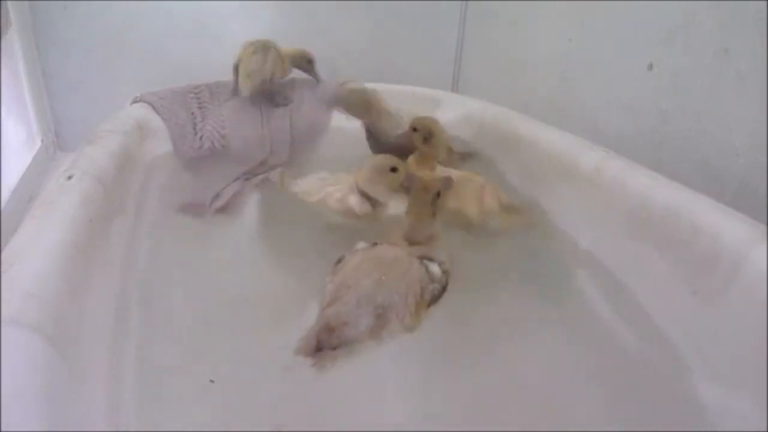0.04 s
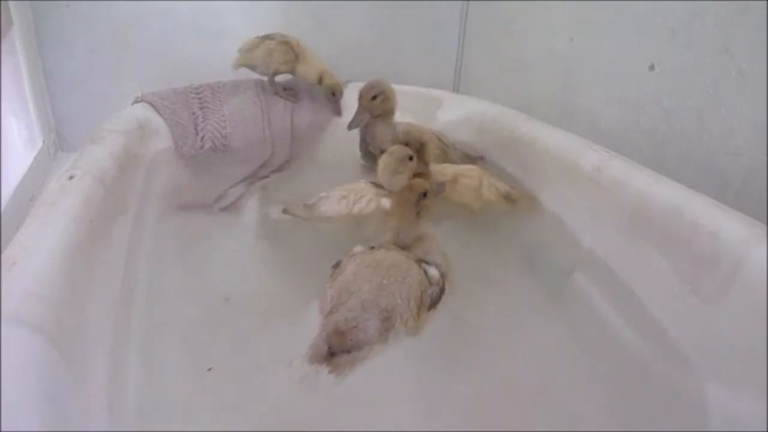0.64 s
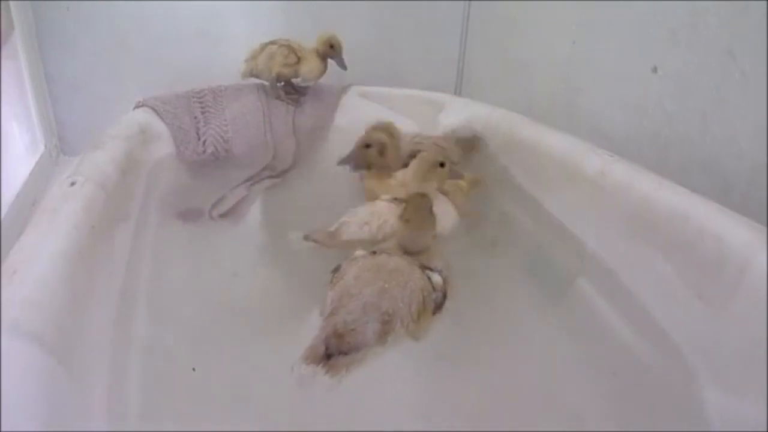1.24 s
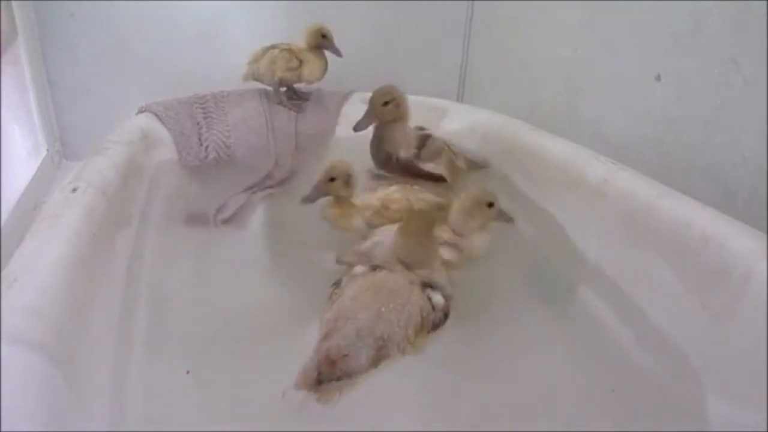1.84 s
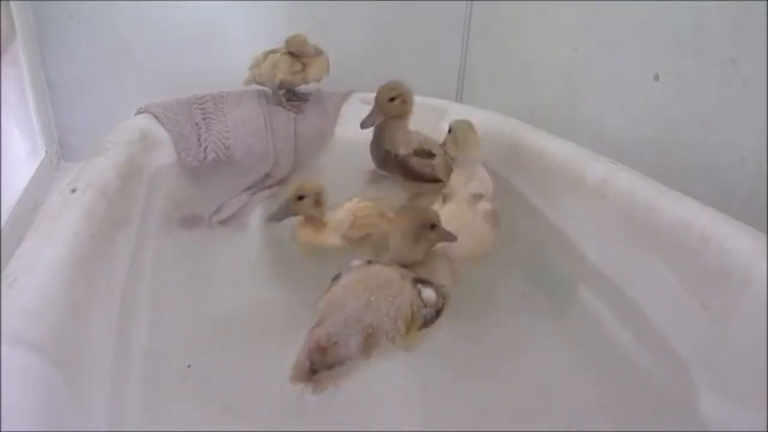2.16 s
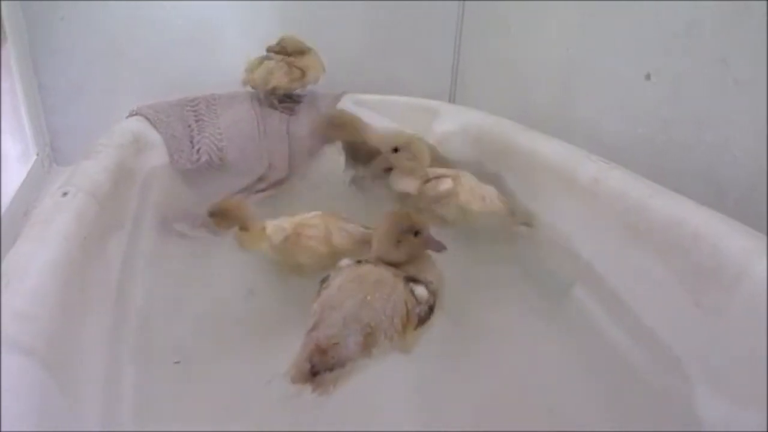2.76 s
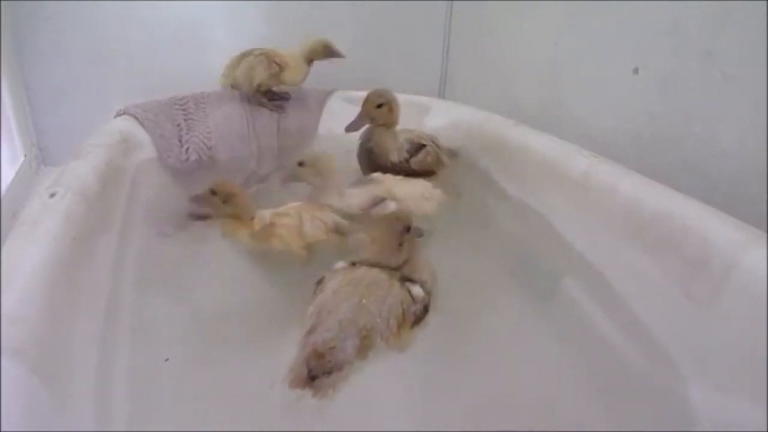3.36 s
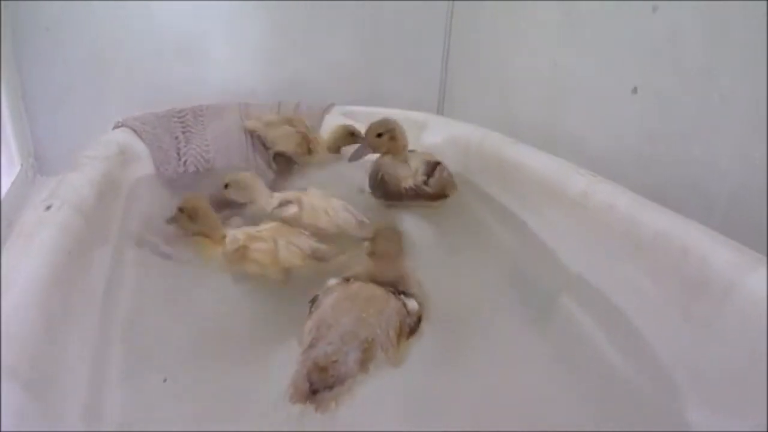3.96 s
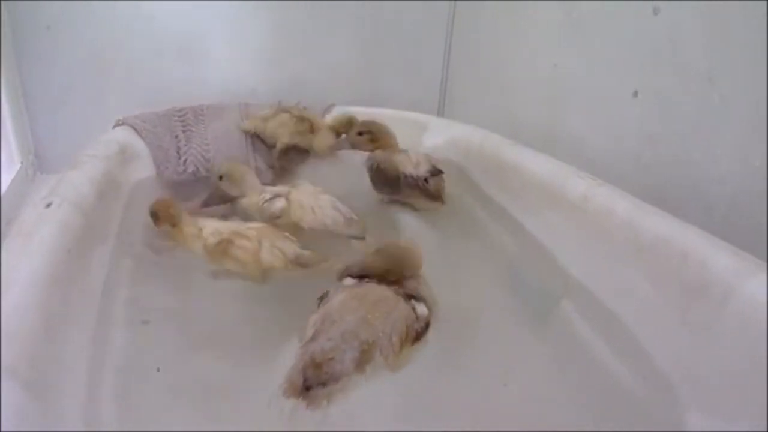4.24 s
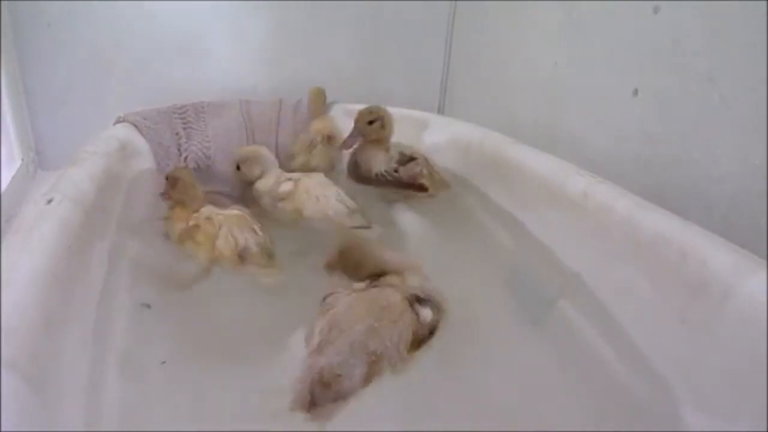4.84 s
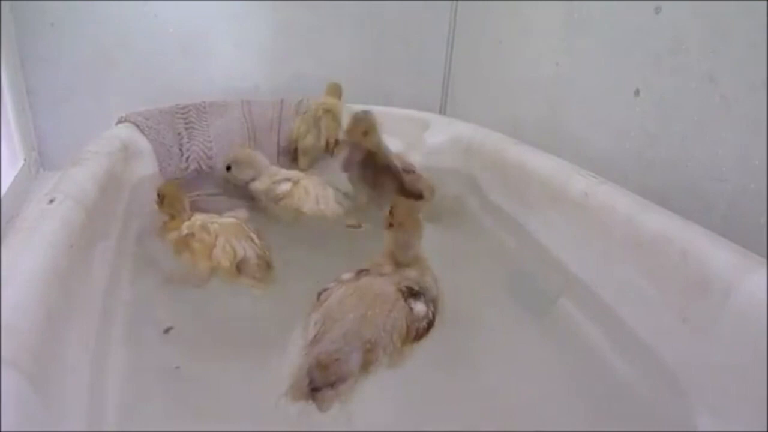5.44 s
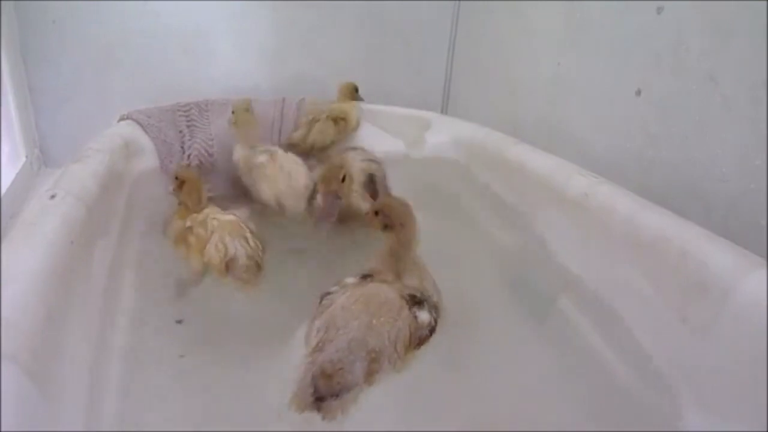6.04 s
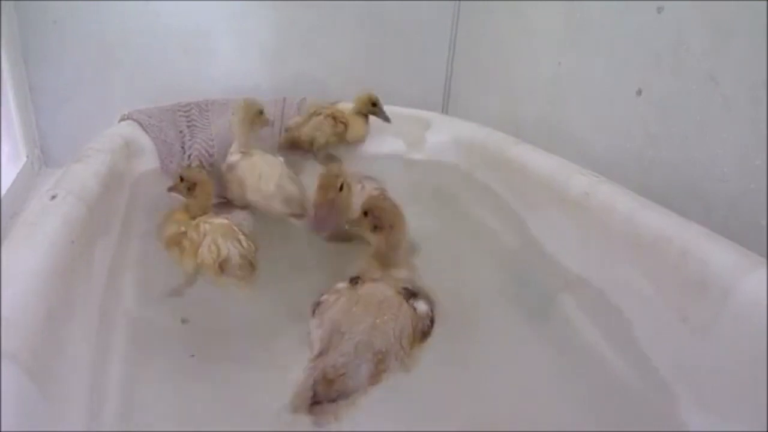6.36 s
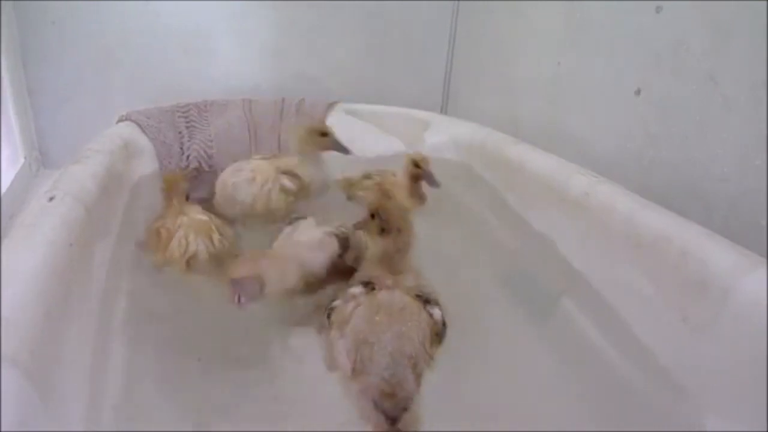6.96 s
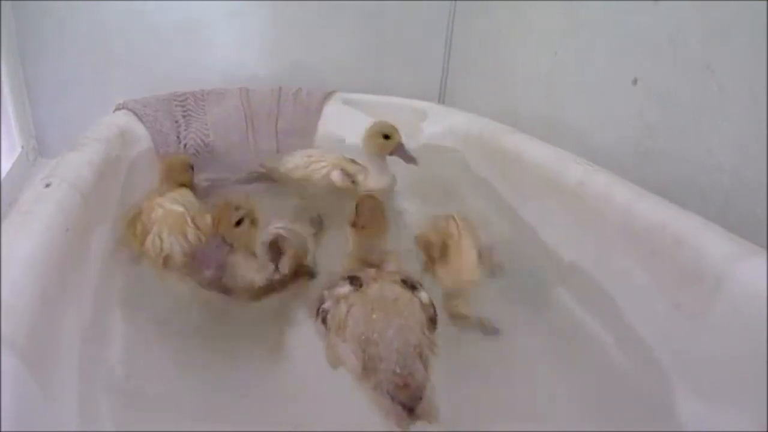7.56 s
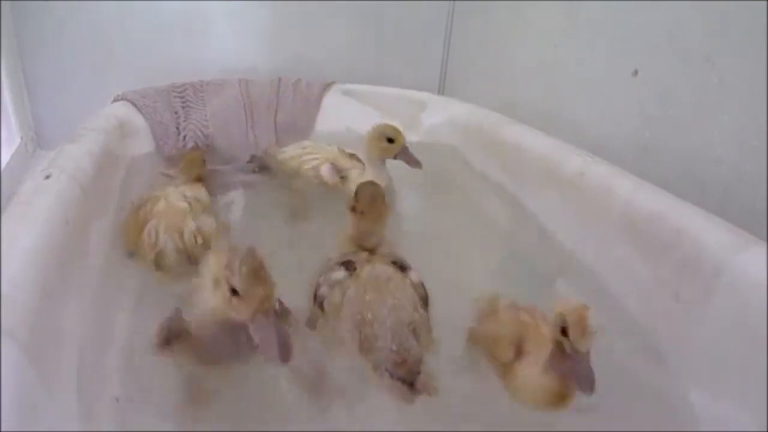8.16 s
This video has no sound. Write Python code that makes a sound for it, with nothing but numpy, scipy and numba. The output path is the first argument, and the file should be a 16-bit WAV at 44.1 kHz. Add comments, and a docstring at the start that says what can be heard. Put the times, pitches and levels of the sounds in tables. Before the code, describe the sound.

Gentle sloshing and scattered little splashes are heard close by as ducklings swim around a plastic tub indoors. Now and then one gives a brief, quiet peep. The water grows livelier, with ticking droplets, small gurgles and low, hollow sloshes, and the strongest splash comes at the end. The small room adds a brief reverberation and faint background noise.

```python
"""A small hard-walled room, where ducklings paddle and dabble in a plastic tub of shallow water.
Each stroke of a foot or bill throws a shower of droplets and traps air, which rings as bubbles:
damped oscillators whose pitch rises as their size falls. The water drives the tub's low modes,
and now and then a duckling gives a soft rising peep. Short reverberation follows each sound."""
import sys
import numpy as np
from scipy import signal
from scipy.io import wavfile
from scipy.ndimage import map_coordinates
from numba import njit

SR = 44100
rng = np.random.default_rng(int(sys.argv[2]) if len(sys.argv) > 2 else 0)


def master(y):
    """Save y as 16-bit WAV."""
    cut = np.clip(np.atleast_2d(y).T, -1, 1)
    pcm = np.round(cut * 32767)  # scale
    wavfile.write(sys.argv[1], SR, pcm.astype(np.int16))


N = 361179
TIME = np.arange(N) / SR
EDGES = np.geomspace(32, 16384, 19)   # half-octave bands, f/Hz
CENTRES = np.sqrt(EDGES[1:] * EDGES[:-1])
SPLASH_HZ, SPLASH_ARCH_DB = 3820, 1.5   # pivot of the droplet spectrum; fall per octave squared
SLOSH_HZ, SLOSH_FALL_DB = 305, 4.5   # corner of the pushed water's spectrum; fall per octave above it

# Levels in the tables are relative: later gains and filters act on them.
# background noise per half octave: f/Hz, level/dB
ROOM_TONE = [(35, -80.5), (65, -61), (200, -63), (330, -58.5), (1500, -61.5), (6000, -60), (15000, -64)]
# stereo width of the diffuse field: f/Hz, side minus mid/dB
DIFFUSE_WIDTH = [(500, -10), (1400, -2.5), (4000, -0.5), (12000, 0.5)]
# reverberation time of the room: f/Hz, T60/s
ROOM_T60 = [(200, 0.4), (2000, 0.24), (14000, 0.21)]
# joint resonances of tub and water: f/Hz, bandwidth/Hz, gain/dB
TUB_MODES = [(68, 6.1, 2), (143.5, 18.3, 4.5), (367, 85, -7), (430.6, 35, 1.5), (526, 72, -3),
             (646, 21, -8.5)]
# half-octave weighting of lapping and splashes: f/Hz, level/dB
WATER_SPECTRUM = [(45, -74), (70, -15.5), (200, -13), (320, -1), (480, -11), (1300, -5.5), (4200, -3),
                  (7000, -3.5), (10500, -4.5), (15000, -4)]
# agitation of the water between strokes: t/s, level/dB
STIR = [(0.0, -51.5), (0.25, -48.5), (0.48, -67), (0.86, -51), (1.45, -46.5), (1.8, -54.5), (2.07, -50),
        (2.75, -44.5), (3.3, -46.5), (3.62, -52), (4.02, -44.5), (4.33, -49.5), (4.6, -42), (4.76, -48),
        (4.96, -39.5), (5.13, -43.5), (5.29, -43), (5.47, -38.5), (5.55, -42), (5.681, -39.5), (5.91, -41),
        (6.02, -41.5), (6.13, -42.5), (6.42, -44), (6.52, -40.5), (6.97, -46), (7.3, -54.5), (7.62, -45),
        (7.87, -41), (8.19, -49)]
# lapping below and trickling above, relative to the stir: f/Hz, level/dB
LAPPING_SPECTRUM = [(100, 1), (300, -8.5), (1250, -6.5), (6500, -2.5)]
# response to the stir's swing, making livelier water brighter: f/Hz, slope/(dB per dB)
STIR_RESPONSE = [(300, 1.03), (1250, 1.75), (6500, 1.61)]
# wet rustles of sieving bills and dripping down: t/s, decay time/s, f/Hz, level/dB
RUSTLES = [(0.978, 0.022, 3410, -42), (2.05, 0.11, 2430, -55), (2.292, 0.02, 4330, -48),
           (2.866, 0.012, 3820, -35), (3.385, 0.025, 2630, -51), (4.858, 0.039, 2336, -39.5),
           (6.222, 0.014, 3520, -33), (7.931, 0.047, 2900, -40)]
# flicked drops striking the wall or the surface: t/s, level/dB, f/Hz
DROP_IMPACTS = [(0.908, -33, 9200), (1.205, -31.5, 8200), (1.353, -29, 3700), (1.637, -35.5, 7100),
                (2.433, -17.5, 5250), (2.984, -25.5, 4280), (3.298, -30, 4100), (3.509, -22, 3970),
                (3.702, -28.5, 10050), (4.651, -29.5, 3840), (5.167, -11.5, 6880), (5.169, -21, 4400),
                (5.747, -15, 6000), (6.528, -22, 7240), (6.823, -18, 6600), (7.175, -32.5, 10600),
                (7.742, -26.5, 6040), (7.971, -23.5, 7050)]
# runs of ever smaller bubbles behind a foot: t/s, duration/s, first f/Hz, last f/Hz, level/dB
GURGLES = [(3.107, 0.024, 1327, 1700, -31), (6.718, 0.054, 970, 1700, -28.5),
           (7.935, .05, 1150, 1540, -29.5)]
# single large air pockets: t/s, f/Hz, level/dB
AIR_POCKETS = [(0.957, 938, -30), (1.111, 1963, -28), (1.118, 122, -27), (1.237, 1880, -34.5),
               (1.338, 1077, -31.5), (1.905, 2100, -33.5), (1.965, 1173, -22.5), (2.495, 1840, -29),
               (2.533, 164, -24.5), (2.639, 1640, -30.5), (2.808, 1375, -30), (3.07, 697, -31),
               (3.233, 2760, -30), (3.245, 1524, -33), (3.683, 98, -29.5), (3.892, 2680, -33),
               (3.956, 1740, -34), (4.258, 1556, -36), (4.467, 137, -28), (4.517, 1170, -21),
               (4.53, 954, -24), (5.057, 1714, -31.5), (5.224, 3600, -20), (5.364, 1923, -23.5),
               (5.613, 127, -23), (5.74, 1525, -21.5), (5.832, 1550, -24.5), (5.841, 2300, -26),
               (5.867, 2380, -31), (5.937, 2040, -27), (6.06, 2060, -23.5), (6.683, 993, -27.5),
               (6.823, 1260, -24), (6.867, 1028, -19.5), (6.89, 2180, -17.5), (6.961, 4240, -30),
               (7.053, 960, -34), (7.473, 1380, -32), (7.663, 842, -28.5), (7.725, 1535, -29.5),
               (7.805, 340, -30.5), (7.886, 143, -31.5), (7.906, 2670, -21), (8.05, 2440, -22)]
# cavities opened by a breast or a broad foot: t/s, starting f/Hz, level/dB, decay time/s, glide/octaves
PLOPS = [(0.157, 306, -25, 0.022, 0.012), (3.78, 352, -30.5, 0.025, 0.25), (4.525, 348, -21.5, 0.024, 0.37),
         (8.066, 268, -17.5, 0.014, 0.19), (8.088, 640, -5.5, 0.0042, -0.3),
         (8.102, 627.7, -15, 0.017, 0.08)]
# duckling calls: t/s, duration/s, first f/Hz, top f/Hz, level/dB
PEEPS = [(0.731, 0.052, 1450, 1782, -37.5), (1.529, 0.043, 1365, 2150, -25.5),
         (1.689, 0.054, 1420, 1963, -28), (2.747, 0.038, 2615, 3520, -23), (5.781, 0.048, 2380, 3020, -28),
         (6.261, 0.085, 2050, 3005, -27), (6.682, 0.082, 2090, 2840, -31.5), (7.1, 0.034, 2450, 2774, -24)]
# strokes of feet and bills: t/s, decay time/s, splash level/dB, tilt/(dB per octave), slosh level/dB
STROKES = [(0.157, 0.017, -51.5, -12.5, -44), (0.561, 0.023, -52, -10.5, -32),
           (0.639, 0.034, -63, -13, -43), (0.744, 0.025, -49.5, 2, -34), (0.957, 0.0035, -49, -8.5, -33),
           (0.977, 0.021, -42, 5, -44), (1.22, 0.015, -37.5, 0, -46), (1.478, 0.012, -33.5, -4.5, -48),
           (1.904, 0.016, -42.5, -5, -39), (1.962, 0.016, -30, 0, -29), (2.035, 0.079, -44, 2.5, -43.5),
           (2.43, 0.0065, -33.5, 1.5, -44), (2.455, 0.019, -30.5, 2, -39), (2.534, 0.01, -62, 1, -28.5),
           (2.755, 0.015, -39.5, 6.5, -42), (2.93, 0.031, -36, 2.5, -43.5),
           (3.006, 0.0043, -31.5, 6.5, -40.5), (3.073, 0.013, -53, -1, -32),
           (3.142, 0.011, -33, 2.5, -38.5), (3.326, 0.0033, -50.5, 16.5, -32.5),
           (3.511, 0.0039, -32.5, 7.5, -55), (3.78, 0.0078, -34.5, -6, -27), (3.85, 0.0015, -25, 11, -31),
           (3.862, 0.017, -44, 9, -47), (3.956, 0.026, -34, 3.5, -43), (4.149, 0.0027, -30, -3, -59),
           (4.469, 0.044, -41.5, -1.5, -33), (4.517, 0.015, -23, 0.5, -17.5), (4.975, 0.014, -27, 1, -33.5),
           (5.072, 0.0051, -33.5, -3, -51), (5.165, 0.011, -29, 3, -33), (5.384, 0.013, -27, 0.5, -33.5),
           (5.425, 0.031, -33.5, -4.5, -39), (5.574, 0.013, -36, 0.5, -34),
           (5.611, 0.0067, -28.5, 1, -24.5), (5.742, 0.015, -28, 3.5, -61),
           (5.831, 0.0021, -30.5, -3.5, -45), (5.841, 0.023, -33.5, -2, -42), (5.936, 0.016, -34, 2.5, -44),
           (5.961, 0.015, -26.5, 3, -38), (6.042, 0.007, -24, -2, -44), (6.058, 0.017, -37, -5.5, -28.5),
           (6.216, 0.0081, -34, -5, -41), (6.528, 0.007, -33, 0, -42), (6.538, 0.0096, -23.5, -0.5, -31.5),
           (6.822, 0.015, -29, 4, -31.5), (6.887, 0.033, -32, -5, -31.5), (7.472, 0.02, -44.5, 4.5, -61),
           (7.734, 0.049, -40.5, 4.5, -49), (7.903, 0.0011, -35.5, 9, -29.5), (8.03, 0.016, -31, 1.5, -61),
           (8.058, 0.017, -21.5, -1.5, -32), (8.0885, 0.002, -14.5, -1, -28),
           (8.138, 0.022, -27, -0.5, -44)]


def from_db(db):
    """Amplitude ratio for a level in decibels."""
    return 10 ** (np.asarray(db) / 20)


def unit_rms(x):
    """Normalisation to a mean square of one."""
    return x / np.sqrt(np.mean(x ** 2) + 1e-20)


def at_hz(points, hz):
    """Interpolation on a logarithmic frequency axis."""
    freqs, values = np.transpose(points)
    return np.interp(np.log(hz), np.log(freqs), values)


def band(x, k):
    """Band-pass filtering to the k-th half octave."""
    return signal.sosfilt(signal.butter(2, EDGES[k:k + 2], "band", fs=SR, output="sos"), x + 1e-18)


def add(out, s, sound):
    """Superposition of a sound starting at time s."""
    start = max(int(s * SR), 0)
    out[start:start + len(sound)] += sound[:max(N - start, 0)]


def wavering(count, width_hz):
    """Random modulation: slow complex noise that spreads a tone over the given bandwidth."""
    low_pass = signal.butter(2, np.clip(width_hz / 2, 10, SR / 10), fs=SR, output="sos")
    slow = signal.sosfilt(low_pass, np.array([1, 1j]) @ rng.standard_normal((2, SR)))
    return np.resize(slow / np.std(slow), count)


def diffuse(k, white):
    """One band of a diffuse field: coherence between left and right falls with frequency."""
    mid, side = band(white, k)
    side = side * from_db(at_hz(DIFFUSE_WIDTH, CENTRES[k]))
    return unit_rms(np.array([mid + side, mid - side]))


def room_tone():
    """Stationary diffuse noise, heard as faint rumble and hiss."""
    white = rng.standard_normal((2, 2, N))
    return sum(from_db(at_hz(ROOM_TONE, hz)) * diffuse(k, white[k % 2]) for k, hz in enumerate(CENTRES))


def reflections(spots, early_db=-5.0, early_s=0.0018, tail_db=-2.5, gap_s=0.00091, corner_hz=200):
    """Impulse responses for spots in the tub: early echoes off its walls, then exponential room decay."""
    t = TIME[:int(.35 * SR)]
    white = rng.standard_normal((2, 2, spots, len(t)))   # neighbouring bands get unrelated noise
    onset = 1 - np.exp(-(t / gap_s) ** 2)
    responses = 0
    for k, hz in enumerate(CENTRES):
        early = from_db(early_db) * unit_rms(np.exp(-t / early_s))
        tail = from_db(tail_db) * unit_rms(np.exp(-np.log(1000) * t / at_hz(ROOM_T60, hz)))
        # echoes are weaker in the bass, so low sounds stay dry
        envelope = np.hypot(early, tail) * hz / (hz + corner_hz)
        echoes = unit_rms(diffuse(k, white[k % 2]) * envelope * onset)
        energy = np.mean(envelope ** 2) * 2 * (EDGES[k + 1] - EDGES[k]) / SR
        responses = responses + echoes * np.sqrt(energy / len(t))
    return responses


def direct_path(x, lag_s=1.6e-5):
    """Path difference: as the birds swim from side to side, their sound reaches one channel first."""
    lag = lag_s * SR * np.interp(TIME, np.linspace(0, N / SR, 20), rng.uniform(-1, 1, 20))
    return np.array([map_coordinates(x, [np.arange(N) + side * lag], order=3, mode="nearest")
                     for side in (1, -1)])


def room(x, direct_db=-3.5, stay_s=.09, spots=11):
    """Direct sound plus convolution with reflections, whose colour changes as the source moves."""
    responses = reflections(spots)
    out = from_db(direct_db) * direct_path(x)
    hop = int(stay_s * SR)
    crossfade = np.sin(np.pi * np.arange(2 * hop) / (2 * hop))
    padded = np.pad(x, (hop, 2 * hop))
    for spot, start in enumerate(range(0, N + hop, hop)):
        piece = padded[start:start + 2 * hop] * crossfade
        for channel, response in zip(out, responses[:, spot % spots]):
            add(channel, (start - hop) / SR, signal.fftconvolve(piece, response)[max(hop - start, 0):])
    return out


def tub(x, through_db=-2.0):
    """Forced vibration: the water drives the tub's low modes, which boom along with it."""
    boom = sum(from_db(db) * signal.lfilter(*signal.iirpeak(hz, hz / width, fs=SR), x)
               for hz, width, db in TUB_MODES)
    return from_db(through_db) * x + boom


@njit
def damped_sines(starts, sizes, turns, losses, total):
    """Free decay of oscillators; turns are in radians and losses in nepers per sample."""
    out = np.zeros(total)
    for i in range(len(starts)):
        fade = np.exp(-losses[i])
        feedback = 2 * fade * np.cos(turns[i])
        now, before = sizes[i] * np.sin(turns[i]), 0.0
        for n in range(starts[i], min(total, starts[i] + int(5 / losses[i]))):
            out[n] += now
            now, before = feedback * now - fade * fade * before, now
    return out


def droplets(k, per_s, spread_db, cycles, knee_hz=600, ring_law=0.31, spread_law=0.37, count=30000):
    """Poisson process in band k: small droplets are commoner, more uneven and ring for more cycles."""
    gap, size, sign, pitch = rng.random((count, 4)).T
    ratio = CENTRES[k] / knee_hz   # per_s and cycles hold at the knee
    rate = per_s * min(ratio, ratio ** ring_law)
    starts = np.cumsum(-np.log(1 - gap)) * SR / rate
    band_spread_db = spread_db * (CENTRES[k] / SPLASH_HZ) ** spread_law
    sizes = from_db(band_spread_db * np.minimum(-np.log(1 - size), 3.5)) * np.sign(sign - .5)
    hz = EDGES[k] * np.sqrt(2) ** pitch
    losses = hz / (cycles * (hz / knee_hz) ** ring_law * SR)
    return unit_rms(band(damped_sines(starts.astype(int), sizes, 2 * np.pi * hz / SR, losses, N), k))


def lapping(per_s=600, spread_db=4.5, cycles=3.2, surge_db=0.5, surge_s=0.071):
    """Shot noise of drops and bursting bubbles in stirred water, gently modulated by the wavelets."""
    times, stir_db = np.transpose(STIR)
    mean_db = stir_db.mean()
    swing_db = np.interp(TIME, times, stir_db) - mean_db
    knots = np.arange(N / SR / surge_s + 1)
    surge = from_db(surge_db * np.interp(TIME / surge_s, knots, rng.standard_normal(N)[:len(knots)]))
    out = np.zeros(N)
    for k, hz in enumerate(CENTRES):
        steady_db = mean_db + at_hz(LAPPING_SPECTRUM, hz) + at_hz(WATER_SPECTRUM, hz)
        gain = from_db(steady_db + at_hz(STIR_RESPONSE, hz) * swing_db)
        out += gain * droplets(k, per_s, spread_db, cycles)
    return surge * out


def rustles(q=6.9, rise=6.2):
    """Narrow-band noise: a cluster of like-sized bubbles fizzes around one pitch, swells and dies."""
    out = np.zeros(N)
    for s, decay_s, hz, db in RUSTLES:
        t = TIME[:int(10 * decay_s * SR)]
        fizz = (wavering(len(t), hz / q) * np.exp(2j * np.pi * hz * t)).real
        envelope = 2 * np.exp(-t / decay_s) * (1 - np.exp(-rise * t / decay_s))
        add(out, s, from_db(db) * np.sqrt(2) * envelope * fizz)
    return out


def drop_impacts(tick_s=0.0058, q=7.5, gain_db=7.0):
    """Impact noise: a flicked drop bursts into a brief fizz around its own pitch."""
    out = np.zeros(N)
    t = TIME[:int(8 * tick_s * SR)]
    for s, db, hz in DROP_IMPACTS:
        burst = rng.standard_normal(SR // 10)[:len(t)] * np.exp(-t / tick_s)
        fizz = signal.lfilter(*signal.iirpeak(hz, q, fs=SR), burst)
        add(out, s, from_db(db + gain_db) * fizz / np.abs(fizz).max())
    return out


def bubble(hz, ring_s=0.0072, size_law=0.57, climb=0.075, onset_cycles=0.72, longest_s=0.014, wobble=.25):
    """Volume resonance: air is the spring and water the mass, so big bubbles ring lower and longer."""
    decay_s = min(ring_s * (1000 / hz) ** size_law, longest_s)
    t = TIME[:int(7 * decay_s * SR)]
    jitter = np.resize(rng.standard_normal(SR // 10), len(t))
    blur = wobble * np.sqrt(hz / SR) * np.cumsum(jitter)   # moving water disturbs the phase
    pitch_hz = hz * (1 + 2 * climb * np.tanh(t / decay_s / 2) - climb / 2)   # rises nearing the surface
    phase = 2 * np.pi * np.cumsum(pitch_hz) / SR
    return np.sin(phase + blur) * np.exp(-t / decay_s) * (1 - np.exp(-t * hz / onset_cycles))


def gurgles(gain_db=5.5, fade_db=5.5, scatter=0.045, count=7):
    """Pinch-off: ever smaller bubbles break away in a quick run that rises in pitch and fades."""
    out = np.zeros(N)
    for s, length, first_hz, last_hz, db in GURGLES:
        steps = np.linspace(0, 1, count)
        for progress, early, detune in zip(steps, rng.random(count), rng.standard_normal(count)):
            hz = first_hz * (last_hz / first_hz) ** progress * np.exp(scatter * detune)
            delay_s = length * max(progress - early / count / 2, 0)
            add(out, s + delay_s, from_db(db + gain_db - fade_db * progress) * bubble(hz))
    return out


def air_pockets(gain_db=6.5, fragment_db=-9.5, scatter=0.1915, delay_s=.008, count=5):
    """Fragmentation: an air pocket rings, then breaks into a few bubbles of similar pitch."""
    out = np.zeros(N)
    for s, hz, db in AIR_POCKETS:
        add(out, s, from_db(db + gain_db) * bubble(hz))
        for detune, wait in zip(rng.standard_normal(count), rng.exponential(1, count)):
            fragment = bubble(hz * np.exp(scatter * detune))
            add(out, s + delay_s * wait, from_db(db + gain_db + fragment_db) * fragment)
    return out


def plops(rise=2.7, churn=0.36, churn_hz=300):
    """Cavity collapse: a closing hollow gives one short gliding note, modulated by churning water."""
    out = np.zeros(N)
    for s, hz, db, decay_s, glide in PLOPS:
        age = TIME[:int(10 * decay_s * SR)] / decay_s
        phase = 2 * np.pi * np.cumsum(hz * 2 ** (glide * np.tanh(age / 2))) / SR
        note = (np.exp(1j * phase) * (1 + churn * wavering(len(age), churn_hz))).imag
        add(out, s, from_db(db) * 2 * np.exp(-age) * (1 - np.exp(-rise * age)) * note)
    return out


def peeps(rasp_per_db=0.07, clear_db=-22, rasp_hz=520, arch_hz=2380, round_hz=2400, swell=0.52):
    """Frequency modulation: a duckling's whistle sweeps up, clear when loud and raspy when soft."""
    out = np.zeros(N)
    for s, length, first_hz, top_hz, db in PEEPS:
        progress = np.linspace(0, 1, int(length * SR))
        arc = min((arch_hz / first_hz) ** 2, np.pi)   # low calls round over and fall again
        arch = np.abs(np.sin(progress * arc)) ** (first_hz / round_hz)
        phase = 2 * np.pi * np.cumsum(first_hz + (top_hz - first_hz) * arch / arch.max()) / SR
        rasp = np.clip(rasp_per_db * (clear_db - db), 0, 1)
        voice = (np.exp(1j * phase) * (1 + rasp * wavering(len(progress), rasp_hz))).real
        add(out, s, from_db(db) * np.abs(np.sin(np.pi * progress)) ** swell * voice)
    return out


def splashes(per_s=1300, spread_db=3.0, cycles=2.53, rise=3.66, slap_db=-5.0, quick_s=0.027):
    """Impulsive excitation: a stroke slaps and pushes the water; its droplet shower swells and dies."""
    starts, decays, splash_db, tilt, slosh_db = np.transpose(STROKES)
    colour_db = 2.5 * rng.standard_normal((len(starts), len(CENTRES)))   # droplet sizes vary by stroke
    out = np.zeros(N)
    for k, hz in enumerate(CENTRES):
        octaves = np.log2(hz / SPLASH_HZ)
        thrown = from_db(splash_db + tilt * octaves - SPLASH_ARCH_DB * octaves ** 2)
        pushed = from_db(slosh_db - SLOSH_FALL_DB * max(np.log2(hz / SLOSH_HZ), 0))
        gains = np.hypot(thrown, pushed) * from_db(at_hz(WATER_SPECTRUM, hz) + colour_db[:, k])
        power, slaps = np.zeros(N), np.zeros(N)
        for s, decay_s, gain in zip(starts, decays, gains):
            age = TIME[:int(10 * decay_s * SR)] / decay_s
            add(power, s, (2 * gain * np.exp(-age) * (1 - np.exp(-rise * age))) ** 2)
        out += np.sqrt(power) * droplets(k, per_s, spread_db, cycles)
        # quick strokes put the largest share of their energy into the slap
        slaps[(starts * SR).astype(int)] = gains * np.sqrt(decays * SR) * np.exp(-decays / quick_s)
        unit_energy = np.sqrt(SR / 2 / (EDGES[k + 1] - EDGES[k]))
        out += from_db(slap_db) * unit_energy * band(slaps, k) * (-1) ** k
    return out


def scene(peep_room_db=-3.5, peep_direct_db=-12.0, plop_room_db=-7.0, plop_direct_db=-4.0):
    """Superposition in the room; the peeps, from above the water, and the heavy plops arrive drier."""
    water = tub(splashes() + lapping()) + air_pockets() + gurgles() + drop_impacts() + rustles()
    voices, hollows = peeps(), plops()
    in_room = room(water + from_db(peep_room_db) * voices + from_db(plop_room_db) * hollows)
    direct = from_db(peep_direct_db) * voices + from_db(plop_direct_db) * hollows
    return in_room + direct + room_tone()


def record(dry):
    """Band limiting: a steep low-pass filter removes the treble above 16 kHz."""
    return signal.sosfilt(signal.ellip(10, .2, 80, 16000, fs=SR, output="sos"), dry)


dry = scene()
out = record(dry)
master(out)
```